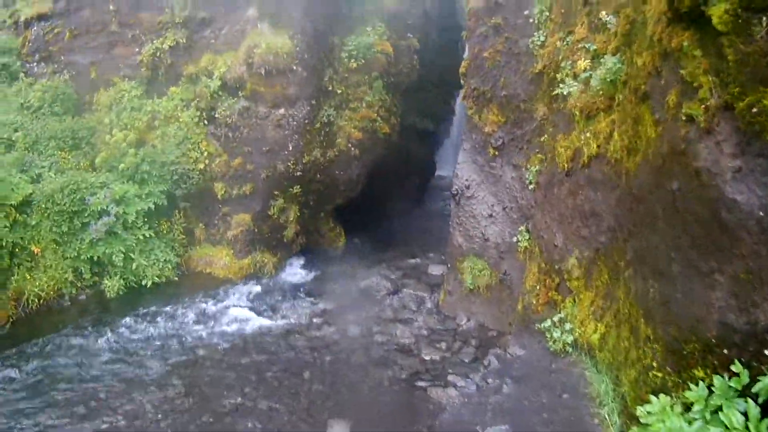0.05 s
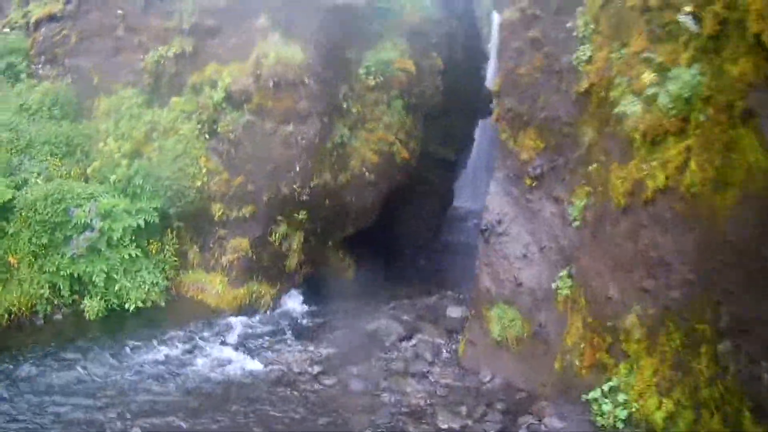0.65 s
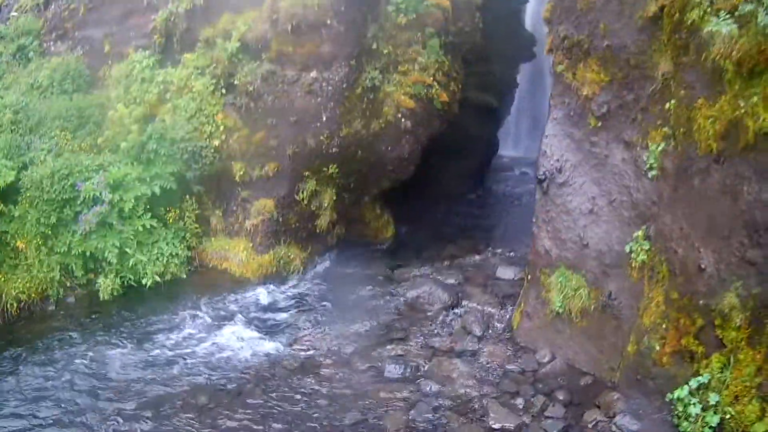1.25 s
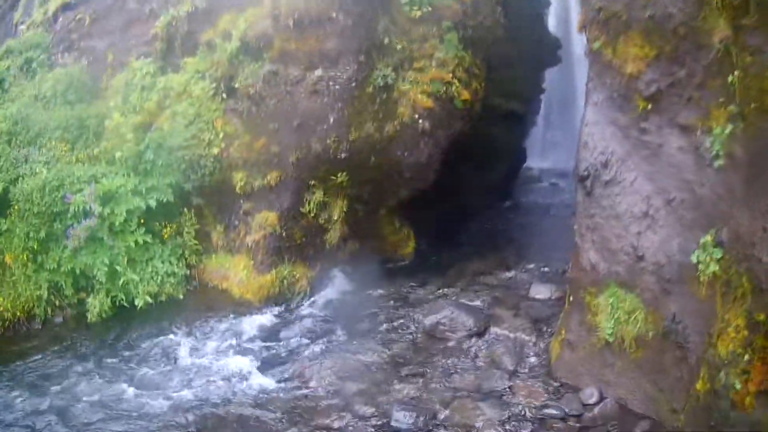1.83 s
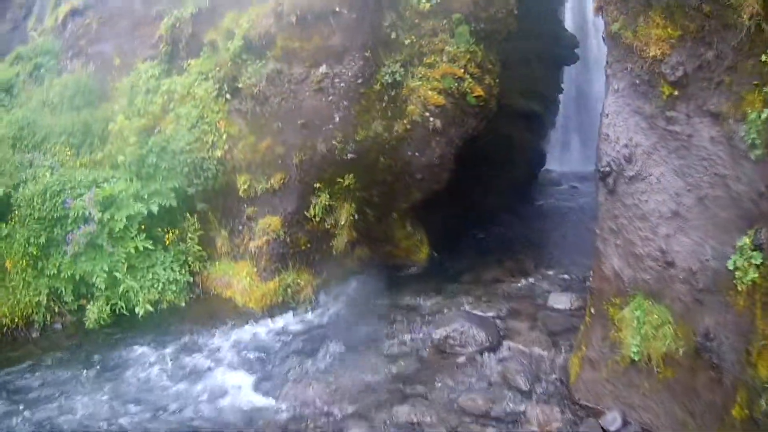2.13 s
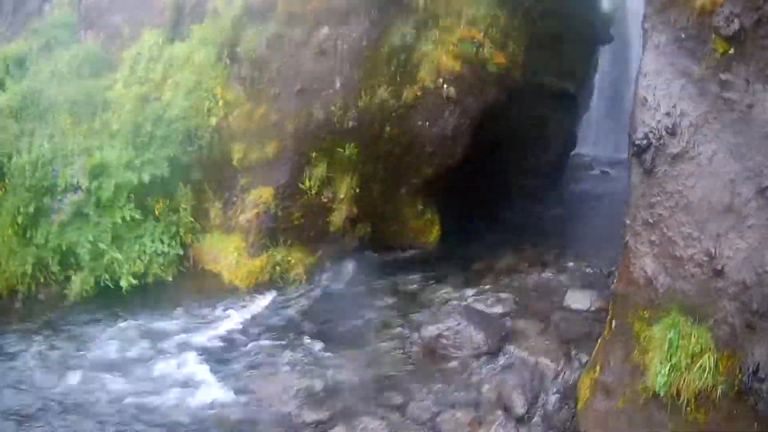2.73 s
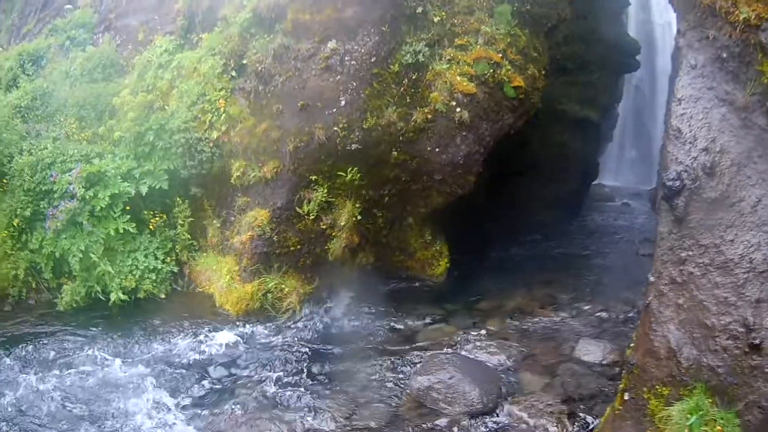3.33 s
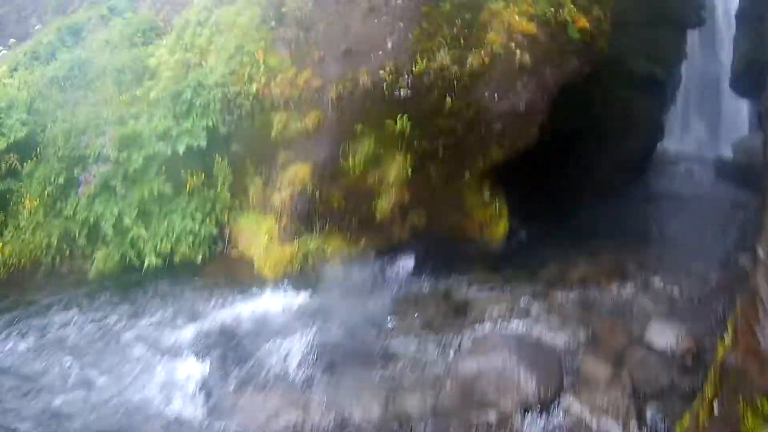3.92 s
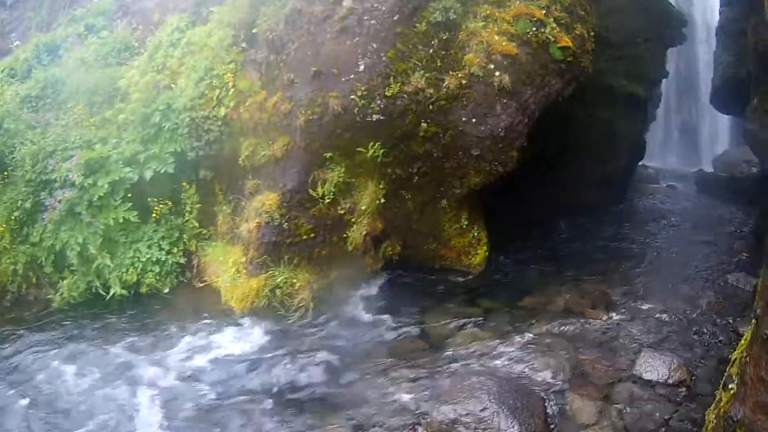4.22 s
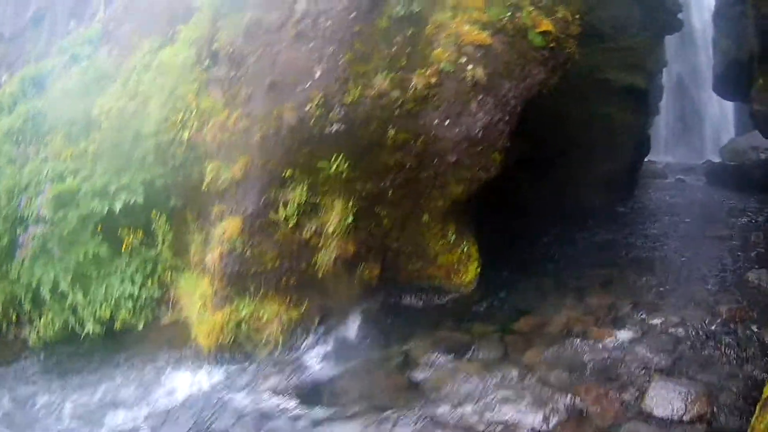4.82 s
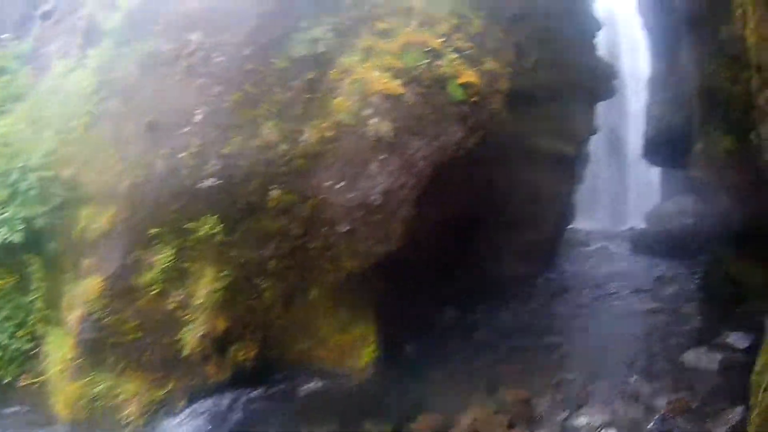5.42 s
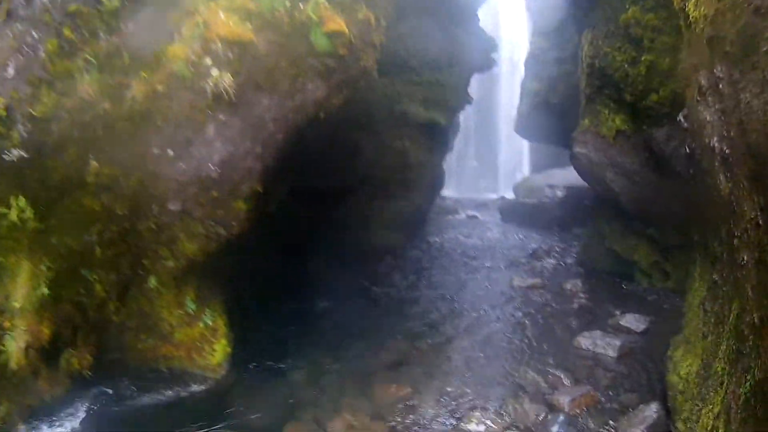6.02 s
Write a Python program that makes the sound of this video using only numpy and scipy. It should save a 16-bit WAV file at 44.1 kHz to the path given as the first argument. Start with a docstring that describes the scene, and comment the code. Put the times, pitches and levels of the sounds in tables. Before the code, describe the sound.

Close finger rubs, thuds and a loud knock on a hand-held camera open over the muffled, hollow rush of a stream in a gorge. As the microphone moves closer, the gurgling, splashing water gets louder and pebbles click lightly now and then. A deep waterfall roar behind it builds late on. Low gusts and occasional handling bumps come and go, with a faint hum and hiss underneath.

```python
"""A narrow gorge, where a waterfall roars behind a shallow, stony stream.
The stream rushes, bubbles and splashes, growing louder as a hand-held camera moves closer; the fall's
low roar swells late on. The camera's housing muffles the water and adds hollow tones. Fingers rub and
knock on it at first; later, pebbles click. Throughout, gusts push on the microphone and the hand bumps
the camera, over a faint hum and hiss."""
import sys
import numpy as np
from scipy import signal
from scipy.fft import rfft, irfft
from scipy.io import wavfile
from scipy.ndimage import uniform_filter1d

SR = 44100
rng = np.random.default_rng(int(sys.argv[2]) if len(sys.argv) > 2 else 0)


def waveform_to_disk(signal):
    """Save audio, clipped to [-1, 1], as 16-bit WAV at the path in sys.argv[1]."""
    frames = np.transpose(np.atleast_2d(signal))
    scaled = np.clip(frames, -1, 1) * 32767
    samples = np.round(scaled).astype(np.int16)
    wavfile.write(sys.argv[1], SR, samples)


N = 267290
TIME = np.arange(N) / SR


def gain_of(db):
    """Turns decibels (dB) into a number to multiply a sound by."""
    return 10 ** (np.asarray(db) / 20)


def evened(x):
    """Scales a signal so that its average size (rms) is one."""
    return x / np.sqrt(np.mean(x ** 2) + 1e-20)


def coloured(x, curve, peaks=()):
    """Shapes the lows and highs of x with a tone curve and ringing peaks, then evens its level."""
    hz = np.fft.rfftfreq(len(x), 1 / SR)
    curve_hz, curve_db = np.transpose(curve)
    db = np.interp(np.log(hz + 1), np.log(curve_hz + 1), curve_db)
    db += sum(lift / (1 + (2 * (hz - centre) / width) ** 2) for centre, width, lift in peaks)
    return evened(irfft(rfft(x) * gain_of(db), len(x)))


def drift(rate_hz):
    """A smooth random wobble; a higher rate makes it quicker."""
    hz = np.fft.rfftfreq(N, 1 / SR)
    return evened(irfft(rfft(rng.standard_normal(N)) * np.exp(-(hz / rate_hz) ** 2), N))


def crackle(per_s, spread_db):
    """Tiny pops at random times, mostly small and a few large."""
    size = gain_of(spread_db * np.minimum(rng.exponential(1, N), 4))
    return size * rng.choice([-1, 1], N) * (rng.random(N) < per_s / SR)


def swell(peak_s, rise_s, fall_s, hold_s=0):
    """A loudness curve that grows to one, holds, then dies away."""
    before = (peak_s - TIME) / rise_s
    after = (TIME - peak_s - hold_s) / fall_s
    return np.exp(-np.maximum(np.maximum(before, after), 0))


def add(mix, start_s, sound):
    """Mixes a sound in at its start time."""
    part = mix[max(round(start_s * SR), 0):][:len(sound)]
    part += sound[:len(part)]


def churn(patchy_db, flicker_db):
    """Tumbling water: noise that comes in short patches of pitch, and flickers as a whole."""
    grid = signal.stft(rng.standard_normal(N), nperseg=512, noverlap=384)[2]  # pitch by time
    patches = uniform_filter1d(rng.standard_normal(grid.shape), size=5, axis=0)
    patches = evened(uniform_filter1d(patches, size=14, axis=1))
    rush = signal.istft(grid * gain_of(patchy_db * patches), nperseg=512, noverlap=384)[1][:N]
    return evened(rush * gain_of(flicker_db * drift(25)))


def bubbles(low_hz, high_hz, per_s, spread_db, fade_cycles, rise, sizes):
    """Air pockets of many sizes ring briefly, rising in pitch as they near the surface."""
    t, out = TIME[:2048], np.zeros(N)
    for hz in np.geomspace(low_hz, high_hz, sizes):
        age = t * hz / fade_cycles
        ring = np.exp(-age) * np.sin(2 * np.pi * hz * t * (1 + rise * np.minimum(age, 4)))
        pops = crackle(per_s / sizes, spread_db)
        out += hz * signal.oaconvolve(pops, ring)[:N]  # small bubbles fill a wider range of pitch
    return evened(out)


# The stream's muffled tone. Each row: pitch in Hz, relative level in dB.
STREAM_TONE = [(100, -27), (300, -3), (550, 1.5), (1000, 0.5), (1250, -2), (1800, 0.5), (2400, -5.5),
               (3000, -11), (3900, -12.5), (4800, -16), (6600, -21.5), (7700, -33.5), (11000, -34)]
# The housing's hollow tones. Each row: pitch in Hz, width in Hz, boost in dB.
HOUSING_PEAKS = [(1386, 250, 10), (1794, 56, 2.5), (3300, 230, 9), (3883, 470, 8.5), (4260, 250, 3),
                 (6940, 1300, 5.5)]
# One surge of the rapids: crest time in seconds, boost in dB, rise and fall in seconds.
RAPIDS_SURGE = (2.77, 1.47, 0.92, 0.061)


def stream(start_db=-62.5, approach_db_per_s=1.42):
    """Water rushes, fizzes, gurgles and splashes, heard through the housing and louder as it nears."""
    splash = rng.standard_normal(400) * np.exp(-TIME[:400] / 0.0012)
    splashes = evened(signal.oaconvolve(crackle(per_s=97, spread_db=1.0), splash)[:N])
    fizz = bubbles(444.4, 6550, per_s=2500, spread_db=2, fade_cycles=4.6, rise=0.026, sizes=24)
    gurgles = bubbles(1089, 2023, per_s=90, spread_db=3.5, fade_cycles=10.7, rise=0.0094, sizes=14)
    babble = gain_of(-11.5) * fizz + gain_of(-18.0) * gurgles + gain_of(-12.5) * splashes
    water = coloured(churn(patchy_db=1.5, flicker_db=-0.1) + babble, STREAM_TONE, HOUSING_PEAKS)
    crest_s, lift_db, rise_s, fall_s = RAPIDS_SURGE
    level_db = start_db + approach_db_per_s * TIME + lift_db * swell(crest_s, rise_s, fall_s)
    return gain_of(level_db + 0.26 * drift(6.3)) * water


# The waterfall's deep tone. Each row: pitch in Hz, relative level in dB.
ROAR_TONE = [(40, 3.5), (90, 0), (180, 0.5), (270, -0.5), (400, -7.5), (700, -11.5), (1200, -39),
             (4000, -59)]


def waterfall(behind_rock_db=-65.5, lift_db=5.5, in_line_s=4.94, turn_s=0.96):
    """The fall roars behind the rock, and swells as the mouth of its cave comes into line."""
    in_line = (1 + np.tanh((TIME - in_line_s) / turn_s)) / 2
    roar = coloured(churn(patchy_db=0.46, flicker_db=-1.0), ROAR_TONE)
    return gain_of(behind_rock_db + lift_db * in_line) * roar


# The wind's rumble. Each row: pitch in Hz, relative level in dB.
WIND_TONE = [(8, -2), (17, -0.5), (28, -12), (45, -15.5), (70, -26.5), (140, -43), (300, -69)]
# Gusts on the microphone. Each row: time of the peak in seconds, level in dB.
WIND_GUSTS = [(0.46, -36), (1.17, -38), (1.75, -38), (2.26, -46), (2.76, -39), (3.46, -47), (3.89, -34.5),
              (4.30, -46.5), (5.05, -47), (5.50, -37)]


def wind(draught_db=-54, extra_at_start_db=6.5, settle_s=0.9):
    """Air swirls at the microphone: an uneven draught that settles, and gusts that come fast and ebb."""
    draught = gain_of(draught_db + extra_at_start_db * np.exp(-TIME / settle_s) + 2.6 * drift(9.1))
    gusts = sum(gain_of(db) * swell(peak_s, rise_s=0.03, fall_s=0.084) for peak_s, db in WIND_GUSTS)
    rumble = coloured(rng.standard_normal(N), WIND_TONE + [(2000, -120)])
    return np.hypot(draught, gusts) * rumble


def hum(hz=96.8, level_db=-75):
    """A faint, low hum wavers in pitch and loudness."""
    cycles = np.cumsum(hz + 0.84 * drift(1.8)) / SR
    return gain_of(level_db + 6.1 * drift(2.6)) * evened(np.sin(2 * np.pi * cycles))


# The tone of skin on the housing. Each row: pitch in Hz, relative level in dB.
RUB_TONE = [(60, -3.5), (130, -2.5), (220, -9), (400, -18.5), (700, -11), (1200, -15.5), (1700, -7.5),
            (2200, -18.5), (2900, -25), (4300, -28.5), (5100, -39.5), (6700, -42), (7700, -61),
            (12000, -70)]
# Where rubbing makes the housing ring. Each row: pitch in Hz, width in Hz, boost in dB.
RUB_PEAKS = [(700, 67, 6.5), (1550, 170, 0), (1820, 120, -0.5), (3550, 270, 2)]
# Finger strokes. Each row: time of full pressure and hold in seconds, level in dB,
# rise and release in seconds.
FINGER_STROKES = [(0.045, 0.0081, -46, 0.022, 0.0092), (0.05, 0.045, -53, 0.07, 0.08),
                  (0.268, 0.031, -42, 0.032, 0.0045), (0.449, 0.0094, -44, 0.0094, 0.0036)]


def finger_rubs():
    """Skin sticks and slips in tiny steps that ring the housing; each stroke presses, holds, lets go."""
    slips = evened(crackle(per_s=3000, spread_db=2.0) * gain_of(1.9 * drift(99)))
    pressure = sum(gain_of(db) * swell(peak_s, rise_s, fall_s, hold_s)
                   for peak_s, hold_s, db, rise_s, fall_s in FINGER_STROKES)
    return pressure * coloured(slips, RUB_TONE, RUB_PEAKS)


# Bumps of the hand. Each row: start in seconds, sway level in dB, sway pitch in Hz, thud level in dB.
HAND_BUMPS = [(0.252, -38.5, 41.4, -43), (0.273, -54, 30.4, -34), (0.4175, -29.5, 41.8, -60),
              (0.4508, -30, 39.4, -49), (0.527, -43, 71, -57), (1.154, -34.5, 22.4, -68),
              (2.705, -38.5, 24, -52), (3.833, -42.5, 23, -45), (5.288, -49, 61.4, -48),
              (5.478, -38, 24, -54)]
# The tone of a thud. Each row: pitch in Hz, relative level in dB.
THUD_TONE = [(30, -35), (70, 11), (160, 6.5), (260, -33), (600, -23), (1500, -61)]


def hand_bumps():
    """Each push on the camera body sets off a deep, fading sway and a short, dull thud."""
    t, out = TIME[:16384], np.zeros(N)
    for start_s, sway_db, hz, thud_db in HAND_BUMPS:
        sway = np.sin(2 * np.pi * hz * t) * np.exp(-t * hz / 1.76)
        thud_shape = np.exp(-t / 0.012) * (1 - np.exp(-t / 0.00032))
        thud = coloured(rng.standard_normal(len(t)), THUD_TONE) * thud_shape
        add(out, start_s, gain_of(sway_db) * sway + gain_of(thud_db) * thud)
    return out


# The housing's bright snap. Each row: pitch in Hz, relative level in dB, seconds to fade by 60 dB.
SNAP_TONES = [(1540, 3, 0.018), (2250, -12, .009), (3370, 5, 0.008), (4380, -8.5, 0.016),
              (5250, -8, 0.0063), (5550, -7, 0.011), (6500, -21, 0.0069), (8800, -22, .006)]
# Knocks on the housing and pebble clicks. Each row: start in seconds, strength in dB, ring pitch in Hz,
# seconds to fade by 60 dB, snap level in dB compared with the ring.
CONTACTS = [(0.4177, -8.5, 880, 0.0034, -54), (0.454, -16.5, 206, 0.0075, -22.5),
            (0.5533, -45, 4320, .007, -10), (.601, -44, 655, 0.012, -25), (2.249, -46.5, 1140, 0.01, -8),
            (2.458, -55, 4430, .012, -14), (2.517, -39.5, 680, 0.02, -28), (3.345, -53, 3400, .015, -7),
            (4.019, -39.5, 1540, 0.013, -15), (4.5636, -37, 1590, 0.013, -15),
            (4.709, -39, 1460, 0.018, -20)]


def knocks_and_pebbles(hard_contact_s=0.00013, softer_step_db=24.5):
    """Each contact rings very briefly, and a hard edge also sets off the housing's bright snap."""
    t, out = TIME[:4096], np.zeros(N)
    snap = sum(gain_of(db - 60 * t / fade_s) * np.sin(2 * np.pi * (hz * t + rng.random()))
               for hz, db, fade_s in SNAP_TONES)
    for start_s, db, hz, fade_s, snap_db in CONTACTS:
        # A soft fingertip touches for longer than a hard edge: twice as long per step of lost snap.
        contact_s = hard_contact_s * 2 ** (-snap_db / softer_step_db)
        attack = 1 - np.exp(-(t / contact_s) ** 2)
        ring = np.sin(2 * np.pi * hz * t) * gain_of(-60 * t / fade_s)
        add(out, start_s, gain_of(db) * attack * (ring + gain_of(snap_db) * snap))
    return out


def tick(start_s=3.1447, level_db=-46):
    """One tiny, dry tick."""
    out = np.zeros(N)
    add(out, start_s, gain_of(level_db) * np.exp(-TIME[:512] / 0.0004))
    return out


def scene():
    """Everything that reaches the one microphone."""
    background = stream() + waterfall() + wind() + hum()
    return (background + finger_rubs() + hand_bumps() + knocks_and_pebbles() + tick())[None]


# The tone of the microphone's hiss. Each row: pitch in Hz, relative level in dB.
HISS_TONE = [(4590, -8), (7800, -7.5), (11400, -9), (15100, -5), (15600, -6.5)]


def record(dry, hiss_db=-78.5, cutoff_hz=15780):
    """The microphone adds its own hiss, then the very highest pitches are cut away."""
    noisy = dry + gain_of(hiss_db) * coloured(rng.standard_normal(N), HISS_TONE)
    treble_cut = signal.firwin(1023, cutoff_hz, window=("kaiser", 9), fs=SR)
    return signal.oaconvolve(noisy, treble_cut[None], "same")


dry = scene()
out = record(dry)
waveform_to_disk(out)
```